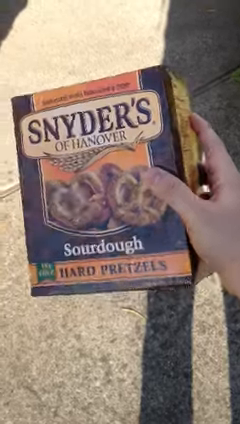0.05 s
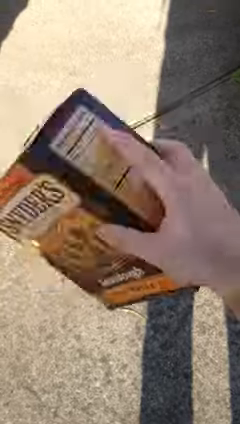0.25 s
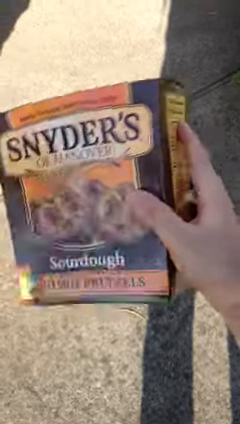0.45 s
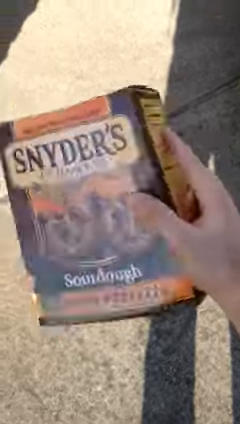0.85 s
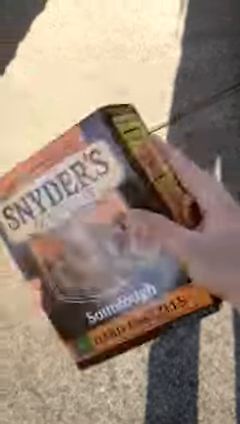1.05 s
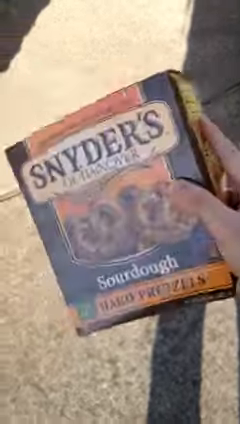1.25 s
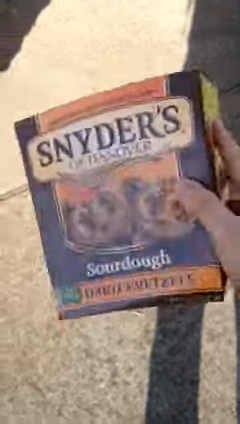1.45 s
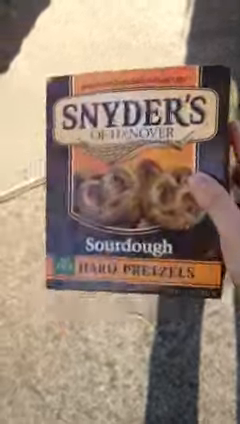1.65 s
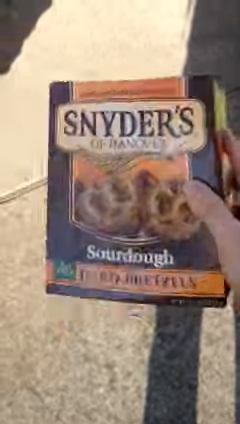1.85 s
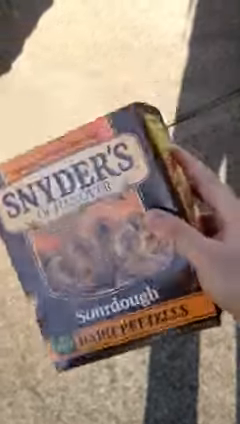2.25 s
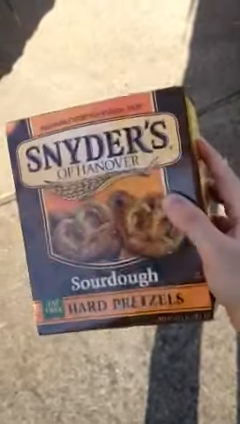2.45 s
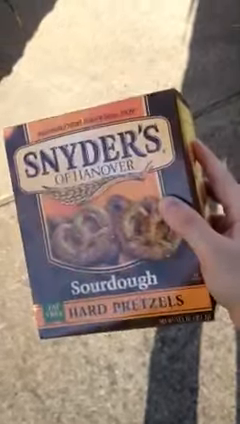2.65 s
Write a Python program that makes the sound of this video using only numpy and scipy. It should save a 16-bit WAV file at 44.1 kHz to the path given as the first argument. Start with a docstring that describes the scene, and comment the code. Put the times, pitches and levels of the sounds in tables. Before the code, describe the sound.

A cardboard box of hard snacks is shaken close by, thudding and clicking.

```python
"""A faint outdoor background is heard first. After a fifth of a second, a hand starts shaking a
cardboard box of hard pretzels close by, about four times a second. At each turn the load lands on
one end as a shower of tiny hits: the box thuds, its panels knock, the pretzels click. Between
landings loose pieces tumble and the liner rustles; hard swings push out soft puffs of air.
The last landings are weaker, and the rattle dies away after about two and a half seconds."""
import sys
import numpy as np
from scipy import signal
from scipy.fft import rfft, irfft
from scipy.io import wavfile

SR = 44100
rng = np.random.default_rng(int(sys.argv[2]) if len(sys.argv) > 2 else 0)


def file_out(sig):
    """Save sig as 16-bit WAV at sys.argv[1]."""
    # one column per channel
    cols = np.atleast_2d(sig).T
    # limit, then scale
    lim = np.clip(cols, -1, 1)
    pcm = np.round(lim * 32767).astype(np.int16)
    wavfile.write(sys.argv[1], SR, pcm)


N = 119070
TIME = np.arange(N) / SR
RING_S = .07  # length of one hit
RING_TIME = np.arange(int(RING_S * SR)) / SR


def amp(db):
    """Turn decibels into a gain."""
    return 10 ** (np.asarray(db) / 20)

def unit(x):
    """Scale each row to an energy of one."""
    return x / np.sqrt(np.sum(x ** 2, axis=-1, keepdims=True) + 1e-20)

def fade(t, t60):
    """Die away by 60 dB in t60 seconds."""
    return np.exp(-np.log(1000) * t / t60)

def add(out, x, start_s):
    """Mix x into out from start_s on."""
    i = max(int(start_s * SR), 0)
    n = max(min(len(x), len(out) - i), 0)
    out[i:i + n] += x[:n]

def colour(x, points, size=2048):
    """Shape the tone along a curve of (Hz, dB) points."""
    hz, db = np.array(points).T
    f = np.maximum(np.fft.rfftfreq(size, 1 / SR), 1)
    cepstrum = irfft(np.log(amp(np.interp(np.log(f), np.log(hz), db))))
    cepstrum[1:size // 2] *= 2  # folded so the filter rings only after a hit
    cepstrum[size // 2 + 1:] = 0
    return signal.fftconvolve(x, irfft(np.exp(rfft(cepstrum))))[:len(x)]


# Tone of the background: f/Hz, level/dB
OUTDOOR_TONE = [(20, -63), (50, -30.5), (90, -20), (145, 1.5), (220, -2.5), (350, -9), (600, -10),
                (1000, -11), (2000, -27), (4500, -32), (10000, -41), (16000, -32.5)]

def outdoor_background():
    """A faint, steady, mostly low noise."""
    return amp(-53) * np.sqrt(N) * unit(colour(rng.standard_normal(N), OUTDOOR_TONE, size=8192))


# Peak of each puff: t/s, level/dB
PUFF_PEAKS = [(.45, -57.5), (.72, -56.5), (.98, -64.5), (1.195, -61.5), (1.665, -53)]
# Tone of the puffs: f/Hz, level/dB
PUFF_TONE = [(15, -19.5), (35, -11.5), (70, -2), (110, 2), (170, -9), (400, -35), (1500, -76.5)]

def air_puffs(width_s=.0192):
    """On hard swings the box pushes out a soft, low gust."""
    swell = sum(amp(db) * np.exp(-.5 * ((TIME - at) / width_s) ** 2) for at, db in PUFF_PEAKS)
    return swell * np.sqrt(N) * unit(colour(rng.standard_normal(N), PUFF_TONE, size=8192))


def echo(x):
    """Sound bounces off pavement and walls, differently for each position of the box."""
    t = np.arange(int(.2 * SR)) / SR
    paths = amp(-8) * unit(rng.standard_normal(len(t)) * fade(t, t60=.283))
    paths[0] += 1  # the direct sound
    return signal.fftconvolve(x, paths)


# Low notes of the box: f/Hz, level/dB, time to fade by 60 dB/s
BOX_NOTES = [(140, -34.5, 0.048), (177, -34.5, 0.036), (231, -5.5, 0.068), (279, 2, 0.0503),
             (332.15, 6.5, 0.0827), (364.5, 15.5, 0.0232), (410, 4, 0.043), (477.5, 1.5, 0.037),
             (587, -19.5, 0.033)]

def box_thuds(count):
    """The box flexes, shifting its notes; each spot that is hit rings them in its own mix."""
    hz, db, t60 = np.array(BOX_NOTES).T[:, :, None]
    flexed_hz = hz * (1 + .0431 * rng.standard_normal(hz.shape))
    notes = amp(db) * np.sin(2 * np.pi * flexed_hz * RING_TIME) * fade(RING_TIME, t60)
    strengths = 1 + .743 * rng.standard_normal((count, len(BOX_NOTES)))
    return unit(strengths @ notes) * rng.choice([-1, 1], (count, 1))

def sharp_hits(count, low_hz, high_hz, t60, note_count=40):
    """Each hit starts with a crack, rings a few strong notes and trails a rustle."""
    hz = low_hz + (high_hz - low_hz) * (np.arange(note_count) + rng.random(note_count)) / note_count
    notes = np.sin(2 * np.pi * hz[:, None] * RING_TIME) * fade(RING_TIME, t60)
    weights = rng.standard_normal((count, note_count))
    ring = unit((weights * abs(weights)) @ notes)
    noise = rng.standard_normal((count, len(RING_TIME)))
    crack = fade(RING_TIME, t60=.00132)
    rustle = amp(-4.5) * fade(RING_TIME, t60=.0752)
    return unit(ring + unit(noise * (crack + rustle)))


# Tone of the cardboard panels: f/Hz, level/dB
PANEL_TONE = [(200, -36), (550, -5.5), (740, 2.5), (1000, -1), (1400, -8), (1850, -7.5), (2400, -20),
              (3500, -33), (8000, -50)]
# Tone of the pretzels: f/Hz, level/dB
PRETZEL_TONE = [(700, -19), (2000, 4), (3200, 2), (3550, 0.5), (4040, 2.5), (4300, 0), (4650, 3.5),
                (5150, -2.5), (5800, -1), (8200, -6), (9500, -10.5), (12500, -12), (15500, -16.5)]

def shower(times, forces, length_s):
    """Hits sound the box, its panels and the pretzels: three layers of equal energy."""
    count = len(times)
    thuds = box_thuds(count)
    knocks = sharp_hits(count, low_hz=452.2, high_hz=3115, t60=.01274)
    clicks = sharp_hits(count, low_hz=1767.6, high_hz=15477, t60=.0096)
    clicks *= amp(-.5 * rng.standard_normal((count, 1)))
    box, panels, pretzels = np.zeros((3, int((length_s + RING_S) * SR)))
    for layer, hits in (box, thuds), (panels, knocks), (pretzels, clicks):
        for start, force, hit in zip(times, forces, hits):
            add(layer, force * hit, start)
    return unit(np.array([box, colour(panels, PANEL_TONE), colour(pretzels, PRETZEL_TONE)]))

def rattle(swell, levels_db, hits_per_s):
    """Unevenly timed hits whose force follows the swell."""
    length_s = len(swell) / SR
    count = max(int(hits_per_s * length_s), 2)
    slots = np.arange(count) + rng.uniform(-1, 1, count) + .5
    times = slots.clip(0, count) * length_s / count
    forces = np.interp(times * SR, np.arange(len(swell)), swell)
    forces *= amp(rng.standard_normal(count).clip(-2, 2))
    return amp(levels_db) @ shower(times, forces, length_s) * np.sqrt(np.sum(swell ** 2))


# Rise and fall of the tumbling: t/s, level/dB
TUMBLE_SWELL = [(.15, -23), (0.219, 5.5), (.42, -3), (.55, 6.5), (.68, -1.5), (.80, 5), (.915, -5.5),
                (1.02, 2), (1.15, 0), (1.28, 1.5), (1.64, -1.5), (1.76, 0), (2.1, -1.5), (2.36, -4.5),
                (2.55, -5), (2.63, -21)]
# Its base mix: thud level/dB, knock level/dB, click level/dB
TUMBLE_MIX = (-48.5, -47.5, -51.5)

def tumbling_pieces():
    """Loose pieces keep bumping around between landings."""
    swell = amp(np.interp(TIME, *np.array(TUMBLE_SWELL).T))
    return echo(rattle(swell, TUMBLE_MIX, hits_per_s=260))[:N]


# Landings: t/s, rise/s, hold/s, thud level/dB, knock level/dB, click level/dB
LOAD_LANDINGS = [ (.230, 0.00465, .030, -31.5, -38.5, -49), (0.276, .013, .020, -31, -28, -38.5),
                 (.325, .008, 0.0196, -33, -38, -45), (0.443, 0.0255, 0.01124, -36.5, -33, -46),
                 (0.496, 0.0051, 0.042, -42, -45.5, -69.5), (.545, 0.027, 0.043, -32.5, -39.5, -47.5),
                 (0.697, 0.0171, .012, -29, -34.5, -41), (0.733, .010, 0.01225, -33, -36.5, -59),
                 (.785, 0.038, 0.0227, -31, -37, -41), (0.949, .011, 0.01328, -29.5, -32, -36.5),
                 (0.978, 0.00641, 0.0139, -31, -37, -41.5), (1.023, 0.04845, 0.01744, -30, -30.5, -40),
                 (1.188, .013, .028, -32.5, -32, -41), (1.250, 0.06105, 0.0362, -38, -36, -43.5),
                 (1.417, .030, 0.0195, -35, -39.5, -43.5), (1.525, .020, .035, -45, -41.5, -48.5),
                 (1.658, .014, 0.033, -32.5, -37, -45.5), (1.762, 0.0152, .040, -34.5, -37.5, -44),
                 (1.897, .012, 0.0244, -31, -36.5, -42), (1.996, 0.01536, 0.0417, -42, -42, -48),
                 (2.139, 0.0177, .032, -35, -38, -46), (2.244, 0.0212, 0.05, -35.5, -39.5, -46),
                 (2.391, .010, .030, -47.5, -46.5, -58.5), (2.449, .020, 0.0778, -49, -49, -67.5)]

def landings(release_s=.009):
    """The load piles into one end of the box: hits build up, hold and die away."""
    out = np.zeros(N)
    for start, rise, hold, *levels_db in LOAD_LANDINGS:
        t = np.arange(int((rise + hold + np.log(30) * release_s) * SR)) / SR
        swell = np.minimum(t / rise, 1) * np.exp(-np.maximum(t - rise - hold, 0) / release_s)
        add(out, echo(rattle(swell, levels_db, hits_per_s=420)), start)
    return out


# Hard hits: t/s, thud level/dB, knock level/dB, click level/dB
HARD_HITS = [ (0.2348, -36, -48.5, -41), (0.2772, -31, -29.5, -39.5), (0.3009, -56, -36, -37),
             (.311, -29.5, -52, -42.5), (.387, -32.5, -33.5, -46.5), (0.4441, -44.5, -41, -46.5),
             (0.4711, -31.5, -27, -34), (0.478, -26.5, -51, -62.5), (0.5249, -50, -54, -51.5),
             (.585, -46, -47, -40.5), (0.6227, -47.5, -55, -39), (.675, -49.5, -49, -60.5),
             (.7125, -29, -32.5, -35), (.9625, -45.5, -29, -40), (0.97, -32, -30, -52.5),
             (1.0416, -34.5, -41.5, -48), (1.193, -28.5, -34, -39.5), (1.2035, -55.5, -28, -38.5),
             (1.2852, -36, -43, -45), (1.3201, -34.5, -36.5, -47), (1.509, -40, -38, -46.5),
             (1.5419, -26.5, -35.5, -54.5), (1.7249, -58, -52, -45), (1.7664, -54, -35, -43.5),
             (1.8989, -36.5, -40, -50), (2.001, -42.5, -41, -47.5), (2.053, -31.5, -59, -54.5),
             (2.072, -59, -46.5, -41), (2.155, -39.5, -36, -52), (2.186, -32, -34.5, -43.5),
             (2.192, -33, -46, -49.5), (2.308, -43.5, -60.5, -52.5), (2.391, -34, -43.5, -52),
             (2.428, -39, -53.5, -56.5), (2.4551, -47, -50, -49), (2.467, -48, -51, -52)]

def hard_hits():
    """Single pieces strike the box hard."""
    out = np.zeros(N)
    for start, *levels_db in HARD_HITS:
        hit = amp(levels_db) @ shower([0], [1], 0) * np.sqrt(.01 * SR)  # levels count over 10 ms
        add(out, echo(hit), start)
    return out


def scene():
    """The background, the puffs and the box, which is too small to give out much bass."""
    background = outdoor_background()
    box = tumbling_pieces() + landings() + hard_hits()
    bass_cut = signal.butter(5, 138, "high", fs=SR, output="sos")
    return (background + air_puffs() + signal.sosfilt(bass_cut, box))[None]

def record(dry):
    """Cut the treble above 15200 Hz."""
    return signal.sosfilt(signal.ellip(10, .2, 80, 15200, fs=SR, output="sos"), dry)


dry = scene()
out = record(dry)
file_out(out)
```